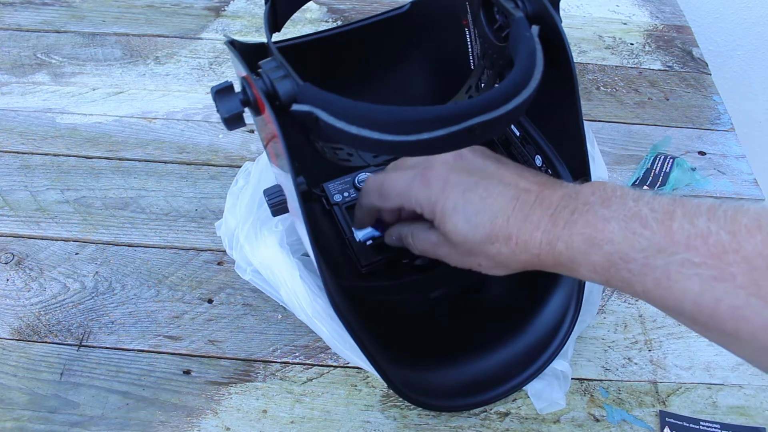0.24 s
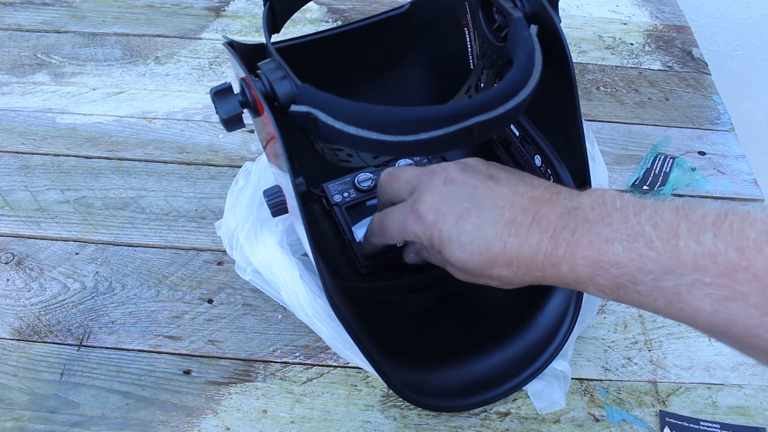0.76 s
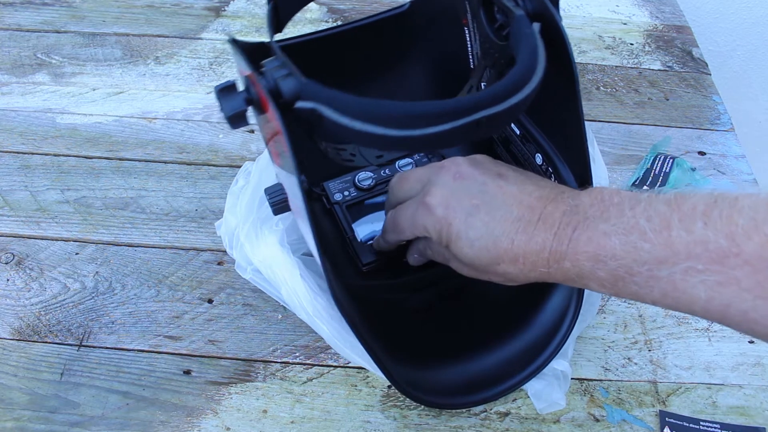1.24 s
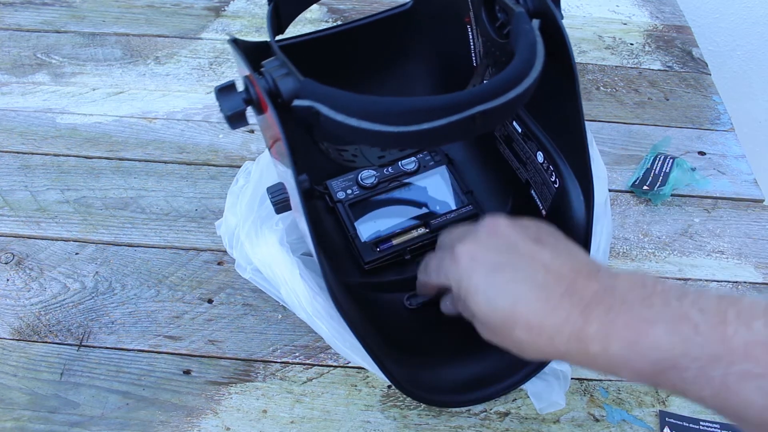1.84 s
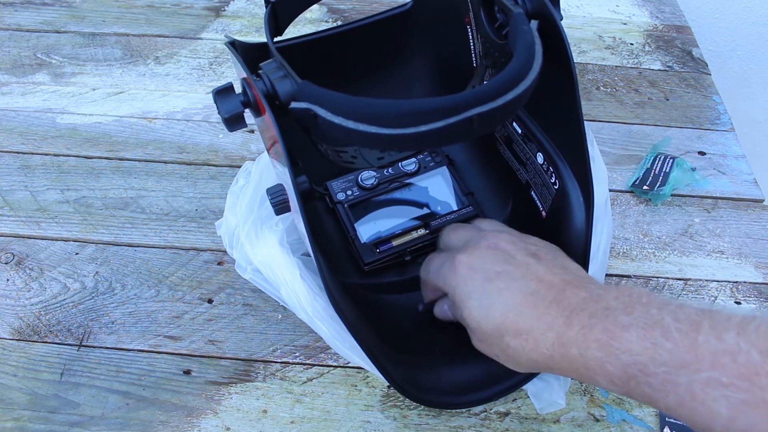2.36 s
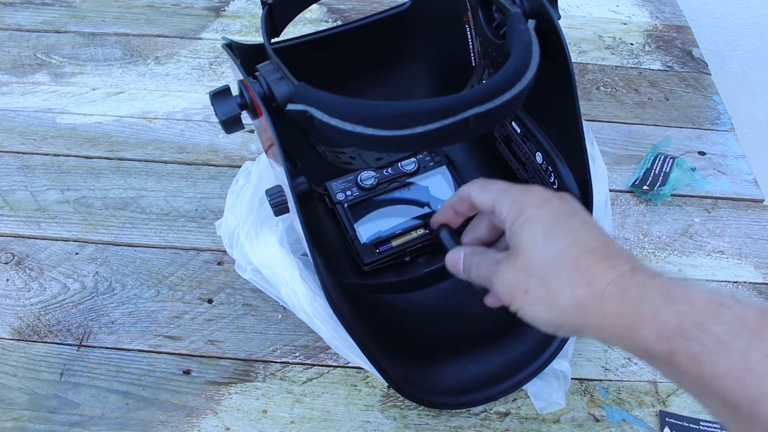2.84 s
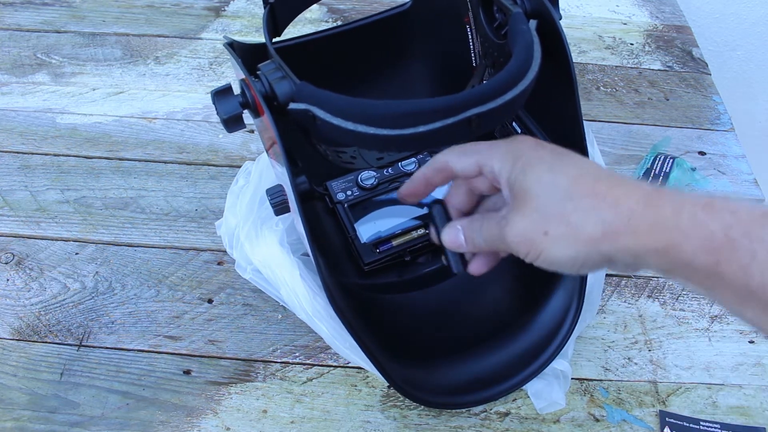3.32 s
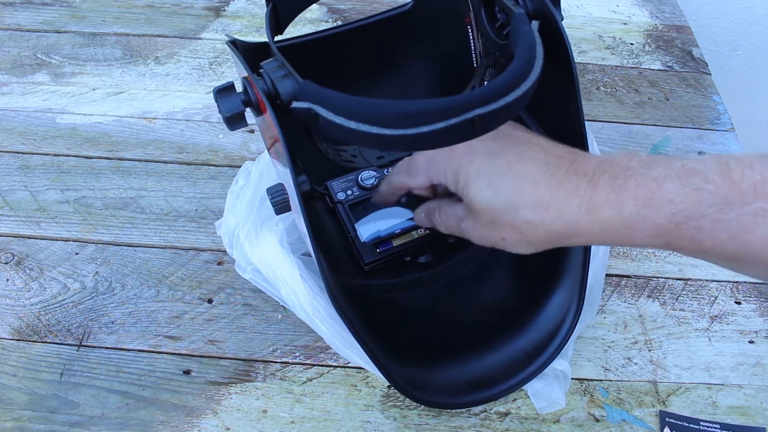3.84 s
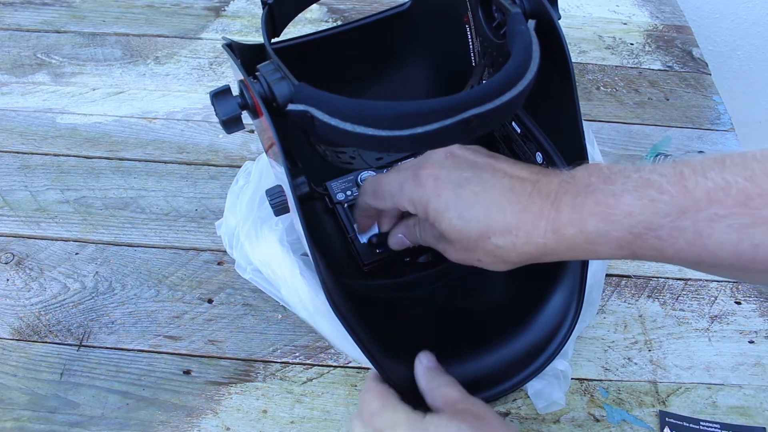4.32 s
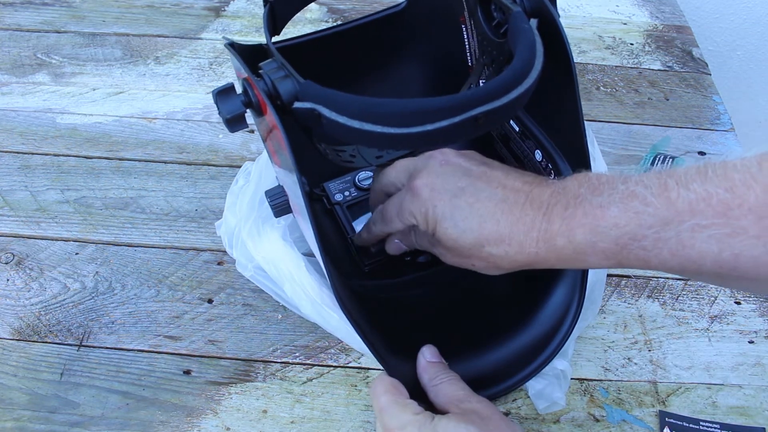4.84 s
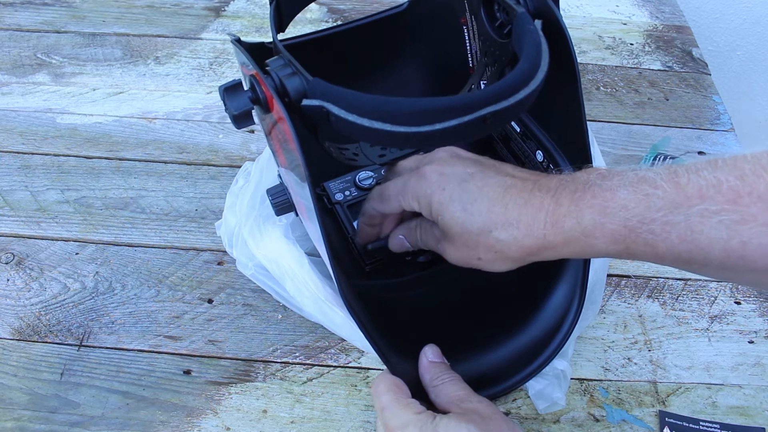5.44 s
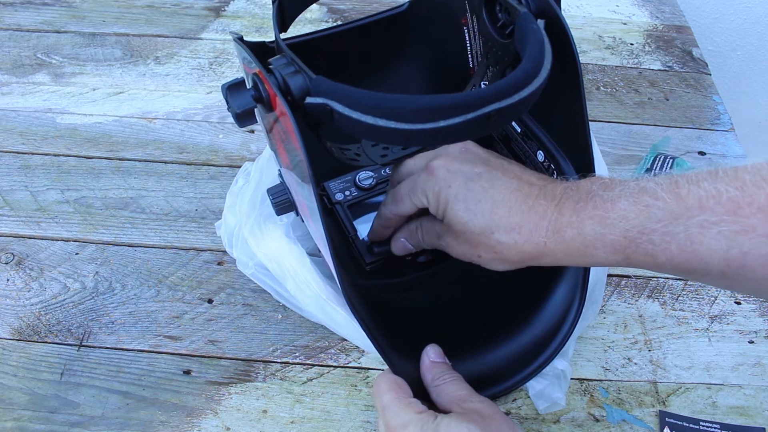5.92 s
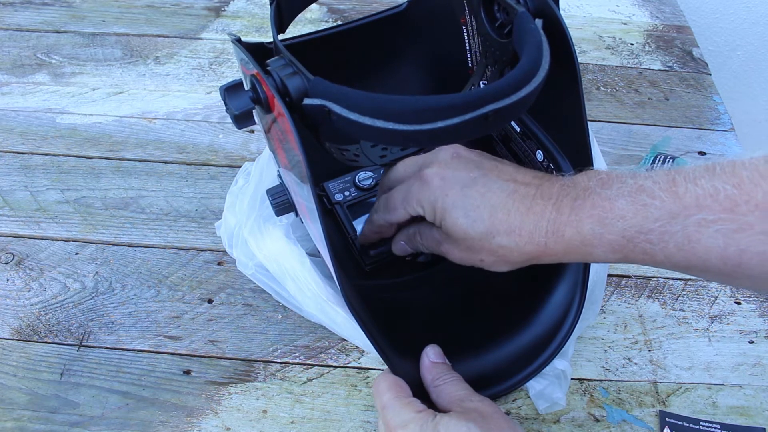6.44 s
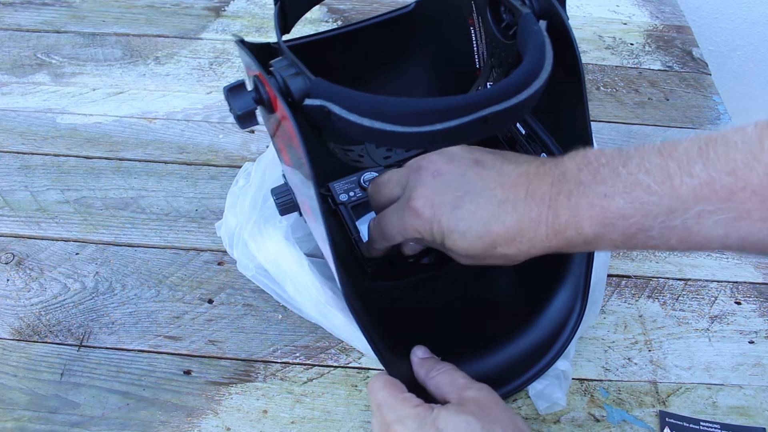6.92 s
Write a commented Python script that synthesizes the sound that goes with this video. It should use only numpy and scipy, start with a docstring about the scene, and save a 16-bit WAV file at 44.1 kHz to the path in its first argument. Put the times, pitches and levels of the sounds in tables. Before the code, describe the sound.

Fingers work a small battery and tray in the holder of a hollow plastic helmet on a wooden table. A rapid ratcheting burst comes first, then a loud snap, short tray scrapes, a quiet gap, a hard clack and irregular small clicks ending in a firm snap. Outdoors, faint wavering hum and soft air; close microphone, handling stronger and fuller on the right, light breeze rumble on the left.

```python
"""Sharp plastic clicks and scrapes ring in a hollow shell, over a distant wavering hum and soft open air.
Fingers press a small battery and its tray into the plastic holder inside a welding helmet, on a wooden table outdoors.
Random contact forces ring the modes of shell, holder and hard edges; decaying noise makes the faint answer of the yard.
The hum is a sine with narrow-band noise; air and breeze are coloured noise.
The camera microphone favours its right side, and the breeze brushes its left port."""
import sys
import numpy as np
from scipy import signal
from scipy.fft import rfft, irfft
from scipy.io import wavfile

SR = 44100
rng = np.random.default_rng(int(sys.argv[2]) if len(sys.argv) > 2 else 0)


def persist_wave(psi):
    """Save psi, clipped to +-1, as 16-bit WAV."""
    counts = np.round(np.clip(psi, -1, 1) * 32767).astype(np.int16)
    wavfile.write(sys.argv[1], SR, np.atleast_2d(counts).T)


N = 316197
TIME = np.arange(N) / SR  # seconds


def undb(db):
    """Decibels to gain."""
    return 10 ** (np.asarray(db) / 20)


def unit(x):
    """Scale to rms 1."""
    return x / np.sqrt(np.mean(x ** 2) + 1e-20)


def curve(rows):
    """Join (s, value) rows by straight lines."""
    return np.interp(TIME, *np.transpose(rows))


def noise(points, size=N):
    """Noise of rms 1 with a spectrum of (Hz, dB) points."""
    hz, db = np.transpose(points)
    f = np.fft.rfftfreq(size, 1 / SR) + 1  # 1 Hz up, to keep the logarithm finite
    colour = undb(np.interp(np.log(f), np.log(hz), db))
    return unit(irfft(rfft(rng.standard_normal(size)) * colour, size))


def band(hz, width_hz, size=N):
    """Noise of rms 1 in one narrow band, at half amplitude half a width from its centre."""
    f = np.fft.rfftfreq(size, 1 / SR)
    resonance = 1 / (1 + (2 * (f - hz) / width_hz) ** 2)
    return unit(irfft(rfft(rng.standard_normal(size)) * resonance, size))


def add(track, s, sound):
    """Mix a sound into the track at time s, kept inside the track."""
    i = int(np.clip(s * SR, 0, N - 1))
    track[i:i + len(sound)] += sound[:N - i]


def shared_air():
    """Outdoor air that both ports share: steady noise, strongest in the upper bass and low mids, thin in the treble."""
    # Spectrum of the shared air. Each row: frequency in Hz, level in dB.
    air_colour = [(15, -32), (42, -9), (75, -15), (190, -6), (370, -6), (520, -7.5), (750, -8.5),
                  (1000, -14.5), (2000, -18.5), (4000, -26.5), (8000, -34.5), (16000, -70)]
    return noise(air_colour)


def diffuse_air():
    """Outdoor air from all around: each port gets its own noise of one colour."""
    # Spectrum of the diffuse air. Each row: frequency in Hz, level in dB.
    diffuse_colour = [(15, -27), (60, -1), (160, 6), (700, 1), (1300, -0.5), (2500, -3.5), (4700, -5),
                      (7000, -10.5), (10000, -14.5), (15000, -22)]
    return np.array([noise(diffuse_colour), noise(diffuse_colour)])


def breeze(rise_s=.04, fall_s=0.085, lull_db=-71.5):
    """Rumbling air on the left port: each gust rises quickly and dies back to a lull."""
    # Gusts added to the lull. Each row: time of the peak in seconds, peak level in dB.
    gusts = [(0, -60), (.67, -50.5), (1.08, -53), (4.33, -49), (4.75, -53)]
    # Spectrum of the rumble. Each row: frequency in Hz, level in dB.
    breeze_colour = [(20, -20), (42, 8.5), (80, 3), (140, -13), (250, -28), (1000, -64)]
    strength = undb(lull_db)
    for s, db in gusts:
        distance = np.maximum((s - TIME) / rise_s, (TIME - s) / fall_s)
        strength = strength + undb(db) * np.exp(-distance)
    return strength * noise(breeze_colour)


def hum(hz=101, width_hz=15, steady=0.74, octave_db=-14):
    """A distant machine hum: narrow noise makes a steady sine waver, with a weak octave."""
    # Slow swell of the hum. Each row: time in seconds, level of the main tone in dB.
    hum_level = [(0, -57.5), (1.4, -52), (2.5, -51.5), (4, -51), (5.2, -48), (6.85, -47.5), (7.17, -53.5)]
    tone = unit(steady * np.sin(2 * np.pi * hz * TIME) + band(hz, width_hz))
    octave = undb(octave_db) * band(2 * hz, 2 * width_hz)
    return undb(curve(hum_level)) * (tone + octave)


def yard(x, t60=0.69, build_s=0.0024, mirrored_db=-5, size=44100):
    """Walls and fences return a thin tail: part mirrors the sound, the rest is scattered into a broad hush."""
    # Spectrum of the scattered hush. Each row: frequency in Hz, level in dB.
    yard_colour = [(100, 15), (600, 4.5), (1100, 13), (2600, 6), (4000, 1), (7000, -23.5), (15000, -62)]
    t = np.arange(size) / SR
    decay = np.exp(-np.log(1000) * t / t60) * (1 - np.exp(-t / build_s))
    decay = decay / np.sqrt(np.sum(decay ** 2))
    mirrored = signal.fftconvolve(x, decay * rng.standard_normal(size))[:N]
    # the hush follows the energy of the sound, smeared by the decay
    energy = abs(signal.fftconvolve(x ** 2, decay ** 2)[:N])
    scattered = np.sqrt(energy) * noise(yard_colour)
    return undb(mirrored_db) * mirrored + scattered


def swishes():
    """Thin bands of high noise swell and fade while the tray is carried over."""
    # Soft high swishes. Each row: start and end in seconds, centre and width in Hz, level at the height in dB.
    swish_moves = [(3.524, 3.82, 7850, 1500, -63), (4.032, 4.266, 6860, 1300, -59.5)]
    out = np.zeros(N)
    for start, end, hz, width_hz, db in swish_moves:
        n = int((end - start) * SR)
        swell = np.sqrt(np.hanning(n))
        add(out, start, undb(db) * band(hz, width_hz, size=n) * swell)
    return out


def helmet(force, seconds, db, shell_db, edge_db, part_hz, damping=1, focus_hz=900, hardness=1.0,
           usual_edge_db=-8, scatter_db=2.5, detune=0.029, size=2048):
    """A contact force rings the modes; the place of the touch shifts and weights them anew, touching skin damps them."""
    # Modes of the helmet: the shell lowest, then the battery holder, then its hard edges.
    # Each row: nominal frequency in Hz, undamped width in Hz, level in dB before the weights below.
    helmet_modes = [(270, 110, -18.5), (404, 95.6, -13), (568, 178, -15), (767, 98, -5.5), (1034, 112, 1.5),
                    (1184, 170, -6), (1453, 73, 2.5), (1740, 210, 1.5), (2070, 273, 2), (2626, 332, 1.5),
                    (2960, 232, 1), (3630, 650, 0.5), (4380, 450, -0.5), (5030, 1320, -5.5),
                    (6360, 1407, -6), (7030, 1770, -9.5), (9870, 1800, -18.5), (11500, 2400, -24.5)]
    shell_top_hz, holder_top_hz = 1350, 3300
    hz, width, mode_db = np.transpose(helmet_modes)
    width = width * damping
    t = np.arange(size) / SR
    chance = rng.standard_normal((len(hz), 2))
    part = np.digitize(hz, [shell_top_hz, holder_top_hz])
    # the holder answers most near the pitch of the piece that is touched
    focus = np.where(part == 1, 1 / np.hypot(1, 2 * (hz - part_hz) / (focus_hz * damping)), 1)
    # a soft touch that hardly stirs the edges reaches their highest modes least
    tilt_db = hardness * min(edge_db - usual_edge_db, 0) * np.log2(np.maximum(hz / holder_top_hz, 1))
    sign = (-1) ** np.arange(len(hz))
    gain = sign * width * focus * undb(mode_db + tilt_db + scatter_db * chance[:, 0])
    decay = np.exp(-np.pi * np.outer(width, t))
    tone = np.sin(2 * np.pi * np.outer(hz * (1 + detune * chance[:, 1]), t))
    modes = gain[:, None] * decay * tone
    out = 0
    # each part is levelled over the given seconds, shell and edges relative to the holder
    for k, part_db in enumerate([shell_db, 0, edge_db]):
        ring = signal.fftconvolve(force, modes[part == k].sum(0))
        out = out + ring * undb(db + part_db) * np.sqrt(seconds * SR / np.sum(ring ** 2))
    return out


def scrapes(slips_per_s=1200, grip_width_hz=160, hush=0.14, scatter_db=1.57):
    """Plastic and skin drag over plastic in a dense run of slips that swells, fades and catches with the grip."""
    # Scrapes and rubs. Each row: start and end in seconds, level of the holder in dB, way of sliding.
    strokes = [(0, 0.48, -45, "battery"), (0.449, 0.474, -41.5, "pressed"), (0.563, 0.6, -37.5, "pressed"),
               (1.184, 1.265, -41.5, "brush"), (1.956, 1.969, -27, "tray"), (2.047, 2.106, -34.5, "tray"),
               (2.147, 2.185, -34, "tray"), (2.263, 2.309, -43.5, "tray"), (2.331, 2.4, -49.5, "tray"),
               (3.86, 4.015, -46, "brush"), (4.386, 4.465, -39, "skin"), (4.456, 4.615, -41.5, "skin"),
               (4.757, 4.87, -53, "pressed"), (5.355, 5.44, -57, "pressed"), (5.46, 5.539, -49.5, "squeak"),
               (5.912, 5.975, -38.5, "pressed"), (6.032, 6.164, -53, "squeak"),
               (6.307, 6.393, -46.5, "pressed"), (6.799, 6.856, -43, "brush"),
               (6.978, 7.128, -45.5, "brush")]
    # Ways of sliding: battery dragged along the ringing holder, loose tray scraped over the bowl, fingertips
    # over plastic, a light brush of the hand, a part pressed firmly, a tight fit that squeaks faintly.
    # Each row: shell and edge in dB relative to the holder, pitch of the touched part in Hz, damping factor.
    slides = {"battery": (-18, -11, 2100, 0.5), "tray": (-10.5, -9.5, 2450, 1.2),
              "skin": (-10, -3, 2150, 3.0), "brush": (-4, -8, 2050, 3.5), "pressed": (5.5, -12, 1880, 1.76),
              "squeak": (-4, -32, 1500, 0.2)}
    out = np.zeros(N)
    ease_s, taper = .008, .65  # extra time at either end, tapered share of the stroke
    spread_db, grip_db = 3.6, 2.2
    grip = undb(grip_db * band(0, grip_width_hz))
    for start, end, db, slide in strokes:
        *colour, damping = slides[slide]
        seconds = max(end - start, ease_s)
        n, i = int((seconds + 2 * ease_s) * SR), int(max(start, 0) * SR)
        slip_force = undb(spread_db * np.minimum(rng.exponential(size=n), 3))
        slips = (rng.random(n) < slips_per_s / SR) * slip_force
        # soft skin damps the plastic and smooths the slips into a hush
        drag = slips * rng.choice([-1, 1], n) + hush * damping * rng.standard_normal(n)
        swell = signal.windows.tukey(n, taper) * np.roll(grip, -i)[:n]
        sound = helmet(drag * swell, seconds, db, *colour, damping=damping, scatter_db=scatter_db)
        add(out, start - ease_s, sound)
    return out


def bumps(rise_s=0.0028, t60=0.022, size=3000):
    """Firm pushes bump the helmet on the table: the whole shell gives a short, dull thud, a fast-dying sine."""
    # Bumps. Each row: start in seconds, level before the envelope in dB, pitch in Hz.
    pushes = [(1.4553, -6, 229), (6.324, -16, 480), (6.802, -10.5, 275)]
    out, t = np.zeros(N), np.arange(size) / SR
    envelope = (1 - np.exp(-t / rise_s)) * np.exp(-np.log(1000) * t / t60)
    for s, db, hz in pushes:
        add(out, s, undb(db) * envelope * np.sin(2 * np.pi * hz * t))
    return out


def click(chatter_ms, db, shell_db, edge_db, part_hz, chatter=0.2, slip=0.076, slip_share=0.41, give=0.59,
          hard_edge_db=-7, bowl=0.011, bowl_ms=8, size=1800):
    """Plastic slips, snaps home and chatters; the bowl of the helmet throws the snap about."""
    ms = np.arange(size) * 1000 / SR - 4  # the sound starts 4 ms before the snap
    # a dull, padded contact rolls in with little snap
    snap = (np.arange(size) == np.argmin(abs(ms))) * undb(give * min(edge_db - hard_edge_db, 0))
    chatter_ms = max(chatter_ms, .2)
    before = slip * np.exp(-abs(ms) / (slip_share * chatter_ms))
    after = chatter * np.exp(-abs(ms) / chatter_ms) + bowl * np.exp(-abs(ms) / bowl_ms)
    force = snap + np.where(ms < 0, before, after) * rng.standard_normal(size)
    return helmet(force, .01, db, shell_db, edge_db, part_hz)  # levelled over 10 ms


def ticks(spread_db=2, shell_db=-4, edge_db=-6, colour_db=3, part_hz=1950, chatter_ms=1.2):
    """Small clicks at chance times, of chance level and colour, while the fingers work."""
    # Spells of fiddling. Each row: start and end in seconds, ticks per second, average level in dB.
    fiddling = [(0.724, 1.352, 13, -53.5), (1.458, 1.809, 10, -45.5), (4.621, 7.1, 26, -50.5)]
    out = np.zeros(N)
    for start, end, rate, db in fiddling:
        for s in rng.uniform(start, end, int(rate * (end - start))):
            force, shell, edge = rng.standard_normal(3)
            tick = click(chatter_ms, db + spread_db * force, shell_db + colour_db * shell,
                         edge_db + colour_db * edge, part_hz)
            add(out, s, tick)
    return out


def ratchet(spread_db=4.0, shell_db=-16, edge_db=-11.0, part_hz=2100, chatter_ms=1.46):
    """The battery sticks and slips along the holder at an uneven pace; the catches swell with the push, then ease."""
    start_s, peak_s, end_s = .01, 0.18, 0.54
    catches_per_s, uneven = 120, .3  # uneven: spread of the timing, as a share of one beat
    peak_db, rise_db_per_s, fall_db_per_s = -33, 41, 28
    out = np.zeros(N)
    for beat in np.arange(start_s, end_s, 1 / catches_per_s):
        late, force, edge = rng.standard_normal(3)
        s = beat + uneven * late / catches_per_s
        eased_db = max(rise_db_per_s * (peak_s - s), fall_db_per_s * (s - peak_s))
        catch = click(chatter_ms, peak_db - eased_db + spread_db * force, shell_db,
                      edge_db + spread_db * edge, part_hz)
        add(out, s, catch)
    return out


def clicks():
    """The battery and its tray knock, catch and snap in, each contact ringing the helmet in its own way."""
    # Clicks and knocks.
    # Each row: snap in seconds, level of the holder over 10 ms in dB, pitch of the touched part in Hz, touch.
    contacts = [(0.0467, -12, 1830, "catch"), (0.102, -15.5, 2330, "crack"), (0.108, -22.5, 1990, "crack"),
                (0.1335, -27, 2360, "catch"), (0.139, -32, 2110, "thud"), (0.1818, -20.5, 2150, "catch"),
                (0.189, -23.5, 2110, "crack"), (0.2164, -23.5, 2120, "catch"),
                (0.2573, -22.5, 2287, "catch"), (0.3321, -36.5, 2300, "crack"),
                (0.428, -27.5, 2120, "clack"), (0.4376, -21, 1610, "knock"), (0.4929, -31.5, 2020, "knock"),
                (0.5583, -21, 1707, "knock"), (0.7626, -48, 2000, "thud"), (0.9535, -31.5, 1680, "knock"),
                (1.0058, -41, 2160, "snap"), (1.0438, -28.5, 2050, "thud"), (1.0638, -26, 1780, "knock"),
                (1.2422, -39.5, 2500, "clack"), (1.3556, -39, 1710, "thud"), (1.4527, -10, 2400, "snap"),
                (1.9446, -25.5, 2410, "clack"), (3.8639, -33, 1580, "catch"), (4.5929, -14, 1960, "clack"),
                (4.6043, -24.5, 2050, "crack"), (4.607, -30, 1660, "knock"), (4.7567, -38, 1540, "snap"),
                (4.8202, -46, 1950, "thud"), (4.9581, -31.5, 1880, "knock"), (5.0859, -41, 1570, "clack"),
                (5.1606, -34, 1941, "knock"), (5.292, -34.5, 2050, "knock"), (5.35, -32.5, 1590, "knock"),
                (5.3981, -39.5, 1780, "thud"), (5.4219, -40, 2000, "snap"), (5.546, -38, 2650, "knock"),
                (5.6537, -40.5, 2100, "clack"), (5.795, -32, 2050, "clack"), (5.8144, -27.5, 2174, "clack"),
                (5.8452, -23, 2230, "clack"), (5.9698, -30, 2170, "clack"), (6.132, -46, 1930, "thud"),
                (6.3259, -39.5, 1940, "thud"), (6.3668, -33, 2090, "snap"), (6.629, -41, 1810, "knock"),
                (6.7999, -18, 1830, "snap")]
    # Touches: a rim catches on a rib, hard edges crack past each other, a part snaps into its seat,
    # hard plastic clacks on plastic, a part held in the fingers knocks, a padded push thuds on the shell.
    # Each row: shell and edge in dB relative to the holder, decay of the chatter in ms.
    touches = {"catch": (-17, -13.5, 2.25), "crack": (-12, -4, 2.2), "snap": (-0.79, -6.5, 2.1),
               "clack": (-6.5, -8.5, 2.9), "knock": (0, -16, 3.9), "thud": (8.7, -14, 5.6)}
    out = np.zeros(N)
    for s, db, hz, touch in contacts:
        shell_db, edge_db, chatter_ms = touches[touch]
        add(out, s - .004, click(chatter_ms, db, shell_db, edge_db, hz))  # the snap lands at s
    return out


def ports(x, corner_hz=5000, treble=0.61, crossfeed=.11):
    """The right port hears the sound whole; the left gets its treble and a weak inverted copy."""
    high = signal.lfilter(*signal.butter(1, corner_hz, "high", fs=SR), x)
    return np.array([treble * high - crossfeed * x, x])


def scene(yard_db=-20.0, yard_left_db=-31, air_db=-49, diffuse_db=-54.0):
    """Handling noises with their echo, the hum, the open air and the breeze."""
    handling = clicks() + bumps() + ratchet() + ticks() + scrapes() + swishes()
    echo = undb(yard_db) * yard(handling)
    near = ports(handling + echo + hum() + undb(air_db) * shared_air())
    diffuse = undb(diffuse_db) * diffuse_air()
    left = breeze() + undb(yard_left_db) * yard(handling)
    return near + diffuse + np.array([left, np.zeros(N)])


def record(dry, bass_hz=28, top_hz=16000):
    """The deepest rumble is rolled off, peaks beyond full scale clip and the top is cut steeply."""
    lean = signal.sosfilt(signal.butter(2, bass_hz, "high", fs=SR, output="sos"), dry)
    clipped = np.clip(lean, -1, 1)
    # order 8, 0.2 dB ripple below the cut, 70 dB down above it
    return signal.sosfilt(signal.ellip(8, .2, 70, top_hz, fs=SR, output="sos"), clipped)


dry = scene()
out = record(dry)
persist_wave(out)
```